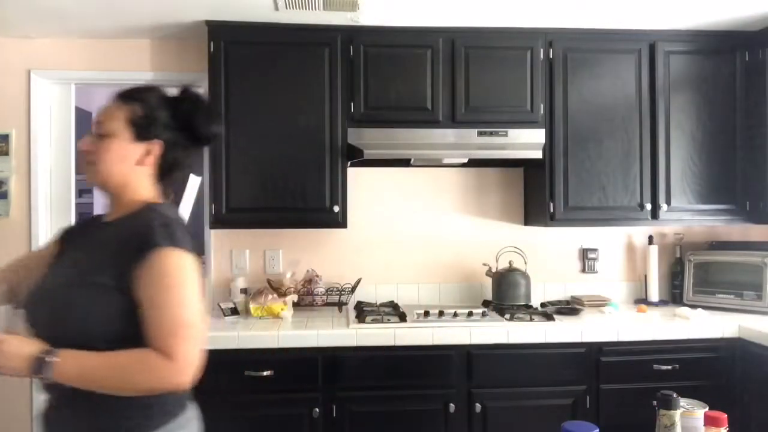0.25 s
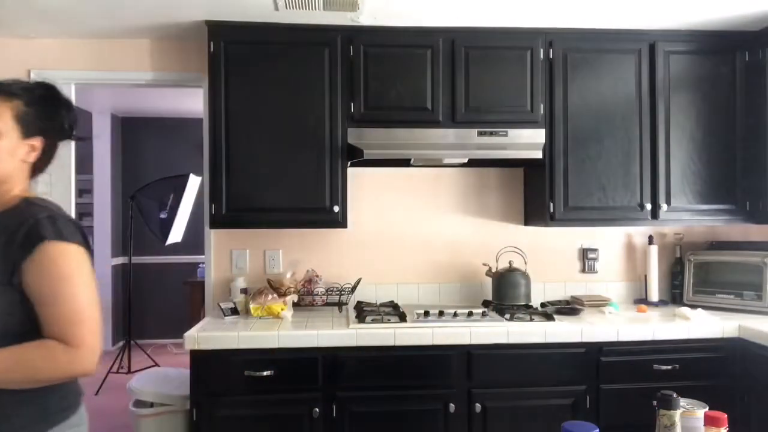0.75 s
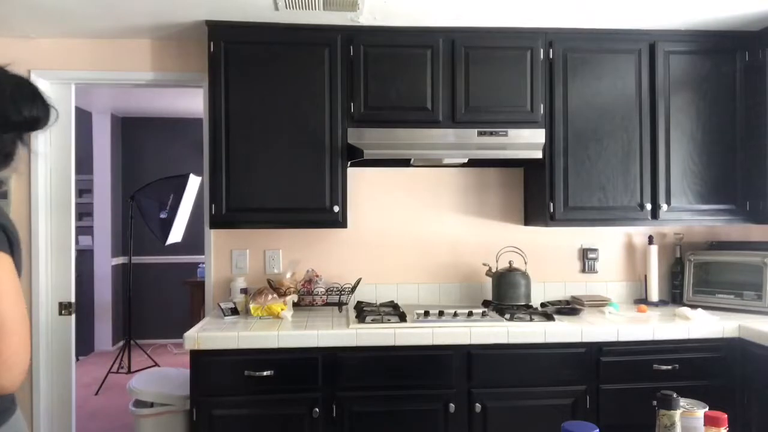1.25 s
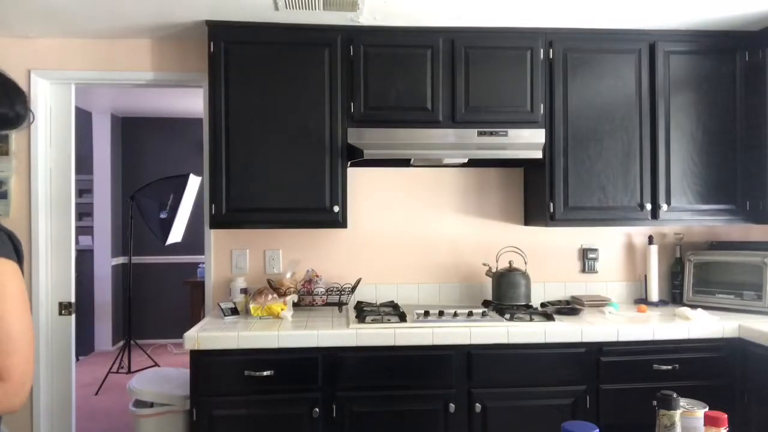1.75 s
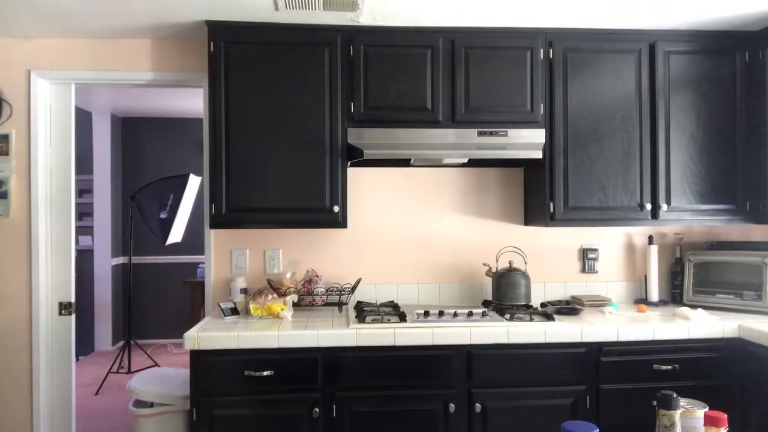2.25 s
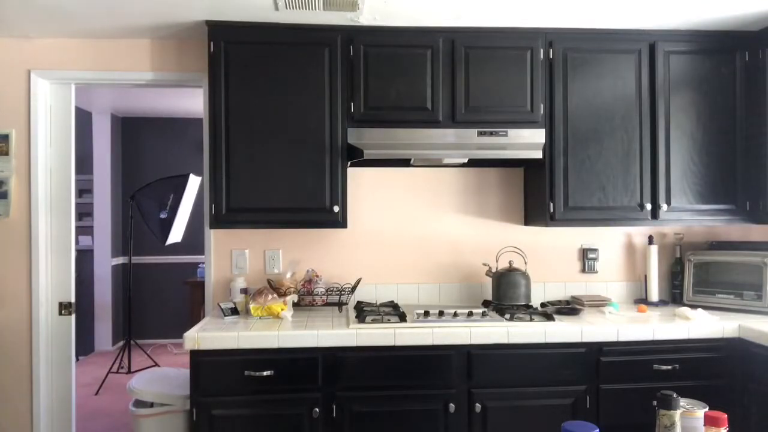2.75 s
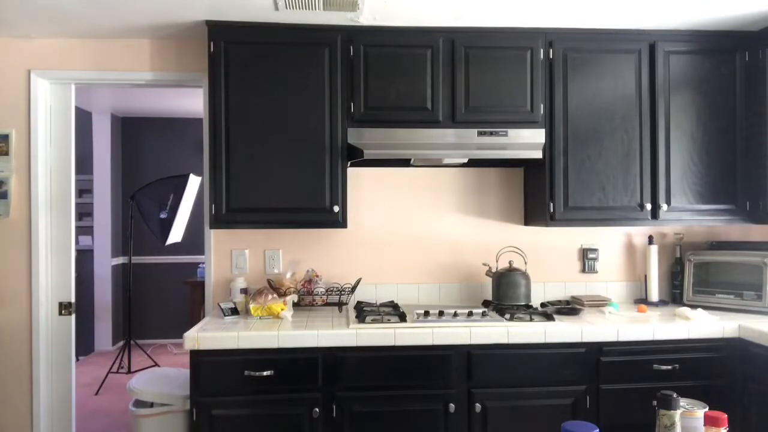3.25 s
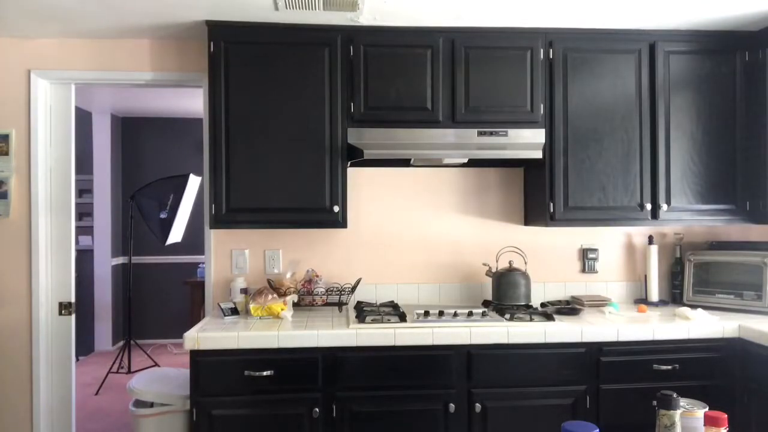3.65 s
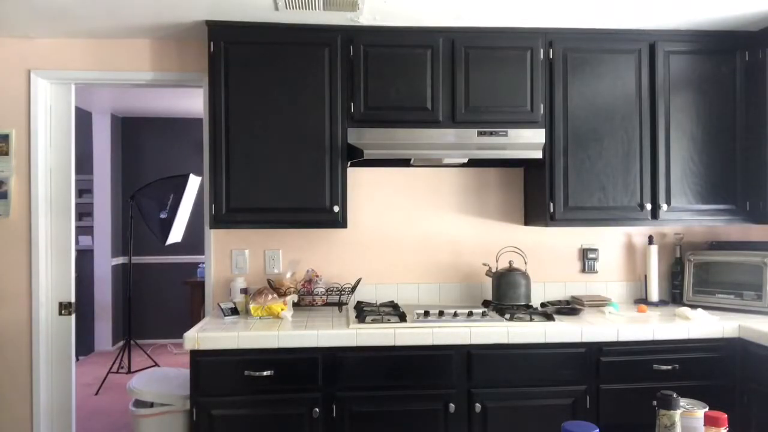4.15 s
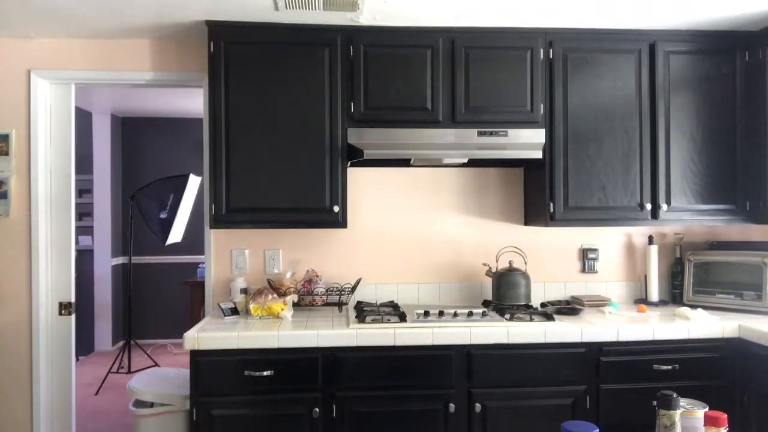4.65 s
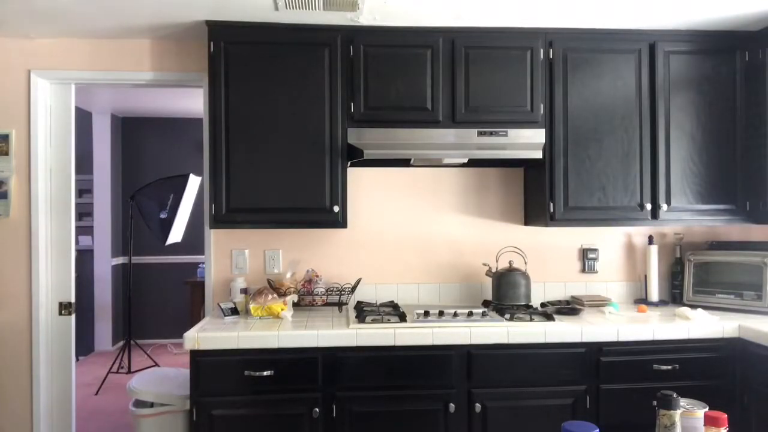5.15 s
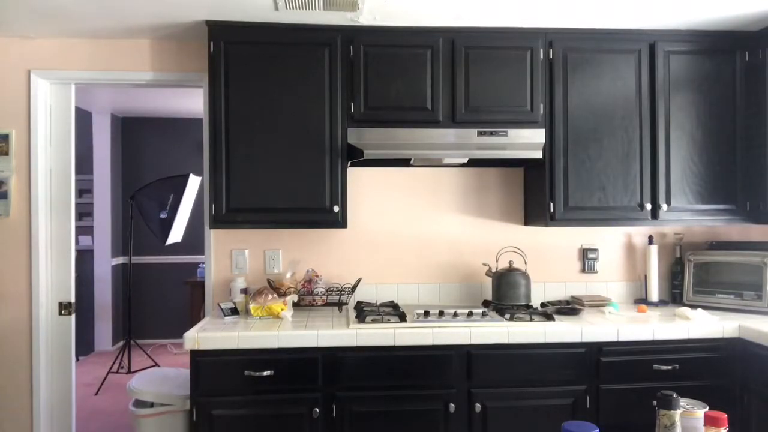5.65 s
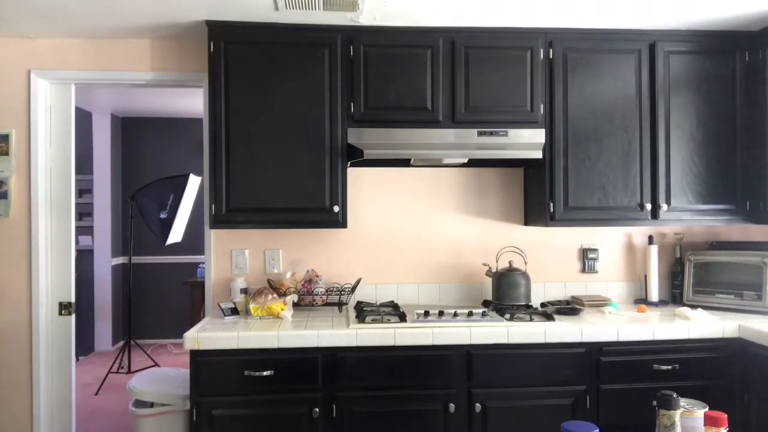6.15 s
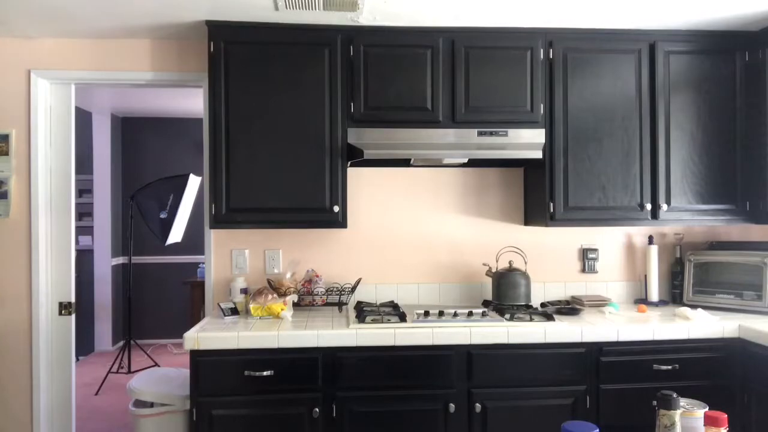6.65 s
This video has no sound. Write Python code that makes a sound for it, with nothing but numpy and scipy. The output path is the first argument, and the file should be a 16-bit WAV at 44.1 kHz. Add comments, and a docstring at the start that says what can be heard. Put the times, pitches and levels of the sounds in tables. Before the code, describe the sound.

In an echoey kitchen, a hand digs noisily through a plastic bin of ice, then a few cubes clink into a drinking glass.

```python
"""In a tiled kitchen, a few steps from the microphone, something hard is put down and a freezer is opened.
A hand digs through the plastic ice bin: random impacts, coloured by the bin, grind, clack and tumble.
Then cubes drop into the glass and excite its modes, decaying sines in beating pairs.
Rubs, knocks, squeaks and a step are shaped noise and impulses; noise and sines make the room tone.
All is heard in mono, with much room and a low appliance hum."""
import sys
import numpy as np
from scipy import signal
from scipy.fft import rfft, irfft, next_fast_len
from scipy.io import wavfile
from scipy.ndimage import uniform_filter1d

SR = 44100
rng = np.random.default_rng(int(sys.argv[2]) if len(sys.argv) > 2 else 0)


def log_audio(samples):
    """Write samples as a 16-bit WAV file to the path given in sys.argv[1]."""
    # one column per channel
    frames = np.atleast_2d(samples).T
    # limit to full scale, then quantise
    limited = np.clip(frames, -1, 1)
    pcm = np.round(limited * 32767).astype(np.int16)
    wavfile.write(sys.argv[1], SR, pcm)


N = 304290

# Strokes of the hand through the ice. Each row: time of full force in s, rise in s, hold in s,
# clatter in dB, bin rumble in dB against it, crunch in dB against it.
STROKES = [(2.876, 0.047, 0.0063, -23, -8.5, -7), (3.12, 0.34, 0.081, -37, -6.5, -11),
           (3.208, 0.034, 0, -24.5, -5, -3.5), (3.238, 0.12, 0, -26, -3.5, -26),
           (3.381, 0.33, 0.034, -29, -6.5, -6), (3.56, 0.22, 0.017, -28.5, -4, -7.5),
           (3.861, 0.21, 0.049, -32.5, -8, -6), (4.193, 0.18, 0.23, -35.5, -15, -10),
           (4.446, 0.42, 0.27, -29.5, -8.5, -9), (4.87, 0.065, 0, -53, 1.5, -4),
           (5.042, .15, 0.015, -57, -1.5, -8), (5.743, .01, 0, -33.5, -15, -3),
           (5.829, 0.015, 0.0075, -33.5, 1, -12), (5.9, 0.06, 0.11, -40, -1, -11),
           (6.067, 0.026, 0, -40, -3, -6)]
# The hollow of the bin. Each row: time in s, level in dB against the clatter.
HOLLOW_LEVELS = [(2.85, -30), (3.9, -49), (4.2, -31), (4.8, 6.5), (5.1, -19), (6.3, -14)]
# Spectrum of cubes in the bin. Each row: frequency in Hz, relative density in dB per Hz.
ICE_SPECTRUM = [(71, -69), (120, -7.5), (246, -8), (314, -1), (483, -5.5), (949, 4), (2930, 3.5),
                (4780, -2), (5990, -13), (10400, -20), (14400, -20.5), (16000, -25)]
# Peaks and dips of the bin. Each row: centre in Hz, width in Hz, height in dB.
BIN_RESONANCES = [(340, 59, 1.5), (409, 81, 7), (564, 200, 3), (912, 63, 3.5), (1540, 940, 3.5),
                  (2860, 310, 1), (4830, 800, -9.5), (6280, 1400, 4), (10420, 430, -6)]
# Single hard clacks of ice in the bin. Each row: start in s, relative level in dB,
# relative thud in dB, relative crack in dB.
CLACKS = [(2.854, -15.5, -1, -20), (3.207, -16, -10.5, 1), (3.236, -20, -30, -24), (3.274, -12.5, -17, -22),
          (3.574, -18.5, -1, -5), (4.185, -28, -9, -12), (4.449, -12.5, -6, -10.5),
          (4.492, -15.5, -20, -12), (4.576, -19, -1.5, -13), (4.738, -22, -5, -39), (4.779, -29.5, -2, -31),
          (5.626, -34, -31, -10), (5.739, -14.5, -23, -16), (5.747, -19, -8.5, -31),
          (5.826, -13.5, -26, -11), (5.879, -23.5, -10, -7), (5.903, -21, -27, -7),
          (6.025, -22.5, -4.5, -12.5), (6.085, -26.5, -2.5, -13.5)]
# Last cubes tumbling on the hollow bin. Each row: start in s, level in dB.
THUMPS = [(5.828, -40), (5.901, -39), (6.024, -43.5), (6.085, -46)]
# Modes of the bin walls. Each row: frequency in Hz, level in dB, t60 in s.
WALL_MODES = [(318.4, -5, 0.15), (556, -1.5, 0.06), (828, -3, 0.025), (920, -15, 0.033), (1450, -8.5, 0.15)]
# Cubes landing in the glass. Each row: start in s, relative ring in dB,
# frequency in Hz that the point of contact favours, relative tap in dB.
DROPS = [(6.654, -28.5, 1897, -25), (6.706, -29.5, 4222, -18.5), (6.862, -26, 5320, -28)]
# Modes of the tumbler. Each row: frequency in Hz, level in dB at a favoured contact, t60 in s.
GLASS_MODES = [(585, 0, .11), (1490, -10, .03), (1897, 1, .18), (2309, -10, .05), (3112, -7, .05),
               (3505, -11, .05), (4222, 0, .17), (5320, 0, .015), (5780, -8, .04), (7340, -1, .03),
               (7800, -7, .04), (11278, -12, .06), (11878, -12, .06), (15095, -13, .02)]
# Things handled and the freezer door. Each row: start in s, relative level in dB,
# relative thud in dB, relative crack in dB.
KNOCKS = [(0.218, -41, -5, -16), (0.383, -46, -36, -4.5), (0.468, -43.5, -17, -2.5), (0.861, -43, 0.5, -9),
          (0.959, -51, 11, -3), (1.127, -25, -8, -19), (1.742, -44, -33, -7.5), (2.621, -25.5, -4.5, -18),
          (6.384, -50, -21, -10), (6.485, -48, -24, -8.5)]
# Modes of something hard set down on the counter. Each row: frequency in Hz, level in dB, t60 in s.
SET_DOWN_MODES = [(345, -2, .16), (964, -5, .12), (1480, -1.5, .008), (2540, -12, .1), (3175, 0, .26),
                  (3795, -20, .1), (4170, -13, .1), (8861, -24, .15)]
# Jolts to the freezer. Each row: start in s, level in dB.
JOLTS = [(2.621, -54), (2.868, -53), (3.235, -59.5)]
# Modes of the freezer cabinet. Each row: frequency in Hz, level in dB, t60 in s.
CABINET_MODES = [(86.4, 2, 2.1), (138.5, 2.5, 0.93), (211, 2, 0.19), (227.7, 8, 0.23), (653, 7.5, 0.041)]
# Modes of a bright clink as the bin is reached. Each row: frequency in Hz, level in dB, t60 in s.
CLINK_MODES = [(1370, 4, .03), (2600, 3.5, .02), (4120, 5.5, 0.052), (4560, -1, .03), (5500, 7, 0.041),
               (6100, 8, 0.047), (7970, 4, 0.018), (9400, -17.5, .02), (10990, -18.5, .02),
               (12400, -19, .02), (13200, -2, .03)]
# Soft rubbing and sliding of things being handled. Each row: time of full force in s, rise in s,
# hold in s, relative hiss in dB, relative body in dB against it.
RUBS = [(0, 0.011, 0, -53, -8), (0.21, .01, 0.23, -55.5, -11), (.48, 0.19, 0, -47.5, -19),
        (0.633, 0.24, 0.0051, -58, -20), (0.855, 0.17, 0.038, -49.5, 0), (.96, .1, 0.0082, -55, 6.5),
        (1.086, .08, 0, -59, -14), (1.686, 0.18, 0.013, -59.5, -26), (1.75, 0.017, 0.017, -53, -19),
        (1.88, .2, 0, -58, -17), (2.6, 0.087, 0.13, -55.5, -4), (5.487, .06, 0.11, -64, 5),
        (5.605, 0.23, 0.11, -46, -10), (6.384, .3, 0.36, -65, 3.5), (6.794, .02, .08, -39, -14)]
# Faint high squeaks. Each row: start in s, length in s, level in dB.
SQUEAKS = [(.56, .15, -62), (1.06, .19, -64)]
# Reverberation of the kitchen. Each row: frequency in Hz, t60 of the tail in s.
REVERBERATION = [(100, 1), (300, 0.51), (2000, 0.67), (5000, 0.58), (13000, 0.4)]
# Spectrum of the room tone. Each row: frequency in Hz, relative density in dB per Hz.
AIR_SPECTRUM = [(15, -46), (25, -6), (48, -12), (68, 5.5), (97, -4.5), (137, -6), (170, -12.5), (217, -4.5),
                (317, -8.5), (575, -11.5), (695, -14), (1130, -12), (1440, -15.5), (3620, -24),
                (10000, -35.5), (16000, -46)]
# Hum of the appliance. Each row: frequency in Hz, level in dB.
HUM = [(59.2, -66), (220.7, -79)]


def digging(rumble_db=-2, clatter_db=-3.0, crunch_db=0, ring_share=0.4, hollow_hz=930, hollow_width_hz=420):
    """Granular collision: cubes tumble over each other and bump the bin; the room carries each stroke on."""
    hits = contacts(rate=120, spread_db=6, steady=0.024)
    cracks = coloured(hits, ice_colour)
    rings = band(cube_rings(hits, centre_hz=2500, spread=.4, t60=.008), 700, 4200)
    ice = cracks / rms(cracks) + ring_share * rings / rms(rings)
    rumble, clatter, crunch = (part / rms(part) for part in registers(ice))
    resonator = signal.iirpeak(hollow_hz, hollow_hz / hollow_width_hz, SR)
    hollow = signal.lfilter(*resonator, clatter)
    clatter = clatter + gains(HOLLOW_LEVELS)[0] * hollow / rms(hollow)
    levels = amp([[rumble_db], [clatter_db], [crunch_db]]) * stroke_levels()
    return in_room(np.sum(levels * [rumble, clatter, crunch], axis=0), count=60)


def stroke_levels(ease_db_per_s=30, settle_s=0.467, crunch_growth=0.86):
    """Addition of powers: overlapping strokes share one gain each for rumble, clatter and crunch."""
    power = np.zeros((3, N))
    for s, rise, hold, db, rumble_db, crunch_db in STROKES:
        force = swell(s, rise, hold, ease_db_per_s, settle_s)
        on = force > 0
        rumble = amp(rumble_db) * force[on]
        crunch = amp(crunch_db) * force[on] ** crunch_growth
        power[:, on] += (amp(db) * np.array([rumble, force[on], crunch])) ** 2
    return np.sqrt(power)


def cube_rings(hits, centre_hz, spread, t60, size=400):
    """Free vibration: each impact rings a cube briefly at a pitch of its own."""
    at, t = np.flatnonzero(hits), np.arange(size) / SR
    hz = centre_hz * np.exp(spread * rng.standard_normal((len(at), 1)))
    hz = np.minimum(hz, SR / 2)
    rings = hits[at, None] * np.sin(2 * np.pi * hz * t) * amp(-60 * t / t60)
    places = at[:, None] + np.arange(size)
    return np.bincount(places.ravel(), rings.ravel(), N + size)[:N]


def ice_colour(hz):
    """Resonance on a broad spectrum: ice on plastic, with the peaks and dips of the bin."""
    bumps = sum(db / (1 + (2 * (hz - centre) / width) ** 2) for centre, width, db in BIN_RESONANCES)
    return amp(along(ICE_SPECTRUM, hz) + bumps)


def ice_clacks():
    """Impact excitation: crumbling clacks take the colour of the bin."""
    return blows(CLACKS, ice_colour, level_db=-15.5, thud_db=-0.5, crack_db=4.5,
                 chatter=0.1, chatter_t60=0.028, direct=0.33)


def thumps():
    """Modal vibration: tumbling cubes make the plastic walls of the bin boom."""
    out = np.zeros(N)
    for s, db in THUMPS:
        add(out, s, amp(db) * ring(WALL_MODES, room=0.59, attack=0.0014))
    return out


def glass(off_db=-12, octaves=0.071, level_db=-5.5):
    """Modal participation: each cube lands on another spot of the wall and brings out other modes."""
    out = np.zeros(N)
    for s, db, favoured_hz, _ in DROPS:
        modes = []
        for hz, mode_db, t60 in GLASS_MODES:
            miss = 1 - np.exp(-(np.log2(hz / favoured_hz) / octaves) ** 2)  # 0 at the favoured pitch
            modes.append((hz, mode_db + off_db * miss, t60))
        add(out, s, amp(db + level_db) * ring(modes, room=1.0))
    return out


def glass_taps():
    """Impact excitation: each landing cube gives the glass a sharp tap."""
    landings = [(s, tap_db, -28, -10.5) for s, _, _, tap_db in DROPS]  # relative thud and crack in dB
    return blows(landings, tap_colour, level_db=-13.5, thud_db=12.0, crack_db=5,
                 chatter=0.03, chatter_t60=0.024, direct=0.41)


def tap_colour(hz, low_hz=1300):
    """Weak low radiation: a hard contact on thin glass has little body."""
    return plain_colour(hz) * hz ** 2 / np.sqrt(hz ** 4 + low_hz ** 4)


def knocks():
    """Impact excitation: clean knocks of things handled and of the freezer door."""
    return blows(KNOCKS, plain_colour, level_db=-11.0, thud_db=2.5, crack_db=4,
                 chatter=0.016, chatter_t60=0.034, direct=0.24)


def fittings():
    """Modal vibration: the thing set down, the jolted freezer and the first clink ring on."""
    out = np.zeros(N)
    add(out, 1.127, amp(-41.5) * ring(SET_DOWN_MODES, room=.85))
    for s, db in JOLTS:
        add(out, s, amp(db) * ring(CABINET_MODES, room=0.71))
    clink = ring(CLINK_MODES, room=.95, tick=6)
    add(out, 2.787, amp(-55.0) * band(clink, 990, 12500))
    return out


def rubbing(body_db=-2, hiss_db=-3.0):
    """Stick and slip: hands and plastic slide in many fine random slips."""
    slips = coloured(contacts(rate=690, spread_db=6), plain_colour)
    body, hiss = band(slips, 200, 2500), band(slips, 2500, 17000)
    body_gain, hiss_gain = rub_levels()
    body = amp(body_db) * body_gain * body / rms(body)
    hiss = amp(hiss_db) * hiss_gain * hiss / rms(hiss)
    return in_room(body + hiss)


def rub_levels(ease_db_per_s=42, release_s=0.36):
    """Addition of powers: overlapping rubs share one gain each for body and hiss."""
    power = np.zeros((2, N))
    for s, rise, hold, db, body_db in RUBS:
        force = swell(s, rise, hold, ease_db_per_s, release_s)
        power += (amp([[db + body_db], [db]]) * force) ** 2
    return np.sqrt(power)


def squeaks(centre_hz=8800, width_hz=600):
    """Narrow-band friction noise: something slides with a thin, hissy squeak."""
    out = np.zeros(N)
    for s, length, db in SQUEAKS:
        noise = rng.standard_normal(int(length * SR))
        hiss = band(noise, centre_hz - width_hz / 2, centre_hz + width_hz / 2)
        add(out, s, amp(db) * np.hanning(len(hiss)) * hiss / rms(hiss))
    return in_room(out)


def footfall(s=0.78, length=0.38, db=-50, top_hz=260):
    """Low-frequency impact noise: a soft step thumps the floor."""
    thump = band(rng.standard_normal(int(length * SR)), 53, top_hz)
    out = np.zeros(N)
    add(out, s, amp(db) * np.hanning(len(thump)) * thump / rms(thump))
    return out


def room_tone(air_db=-57):
    """Stationary noise and pure tones: steady air noise and the hum of an appliance."""
    t = np.arange(N) / SR
    noise = rng.standard_normal(N + SR)
    air = coloured(noise, lambda hz: amp(along(AIR_SPECTRUM, hz)))[SR:]  # the filter's onset is cut off
    hum = np.zeros(N)
    for hz, db in HUM:
        hum += amp(db) * np.sqrt(2) * np.sin(2 * np.pi * (hz * t + rng.random()))
    return amp(air_db) * air / rms(air) + hum


def contacts(rate, spread_db, steady=0.13):
    """Random point process: impacts of uneven size, rate per second, share a steady supply of energy."""
    occurs = rng.random(N) < rate / SR
    hits = occurs * amp(spread_db * rng.standard_normal(N)) * rng.choice([-1, 1], N)
    power = np.abs(uniform_filter1d(hits ** 2, int(steady * SR)))
    return hits / np.sqrt(power + np.mean(power) / 20)


def swell(s, rise, hold, ease_db_per_s, release):
    """Force envelope: a movement builds up to time s, eases while it is held, then dies away."""
    eased_db = -ease_db_per_s * hold
    end = s + hold
    return gains([(s - rise, -30), (s, 0), (end, eased_db), (end + release, eased_db - 60)])[0]


def blows(table, colour, level_db, thud_db, crack_db, chatter, chatter_t60, direct):
    """Impulse excitation: a blow and its short chatter give thud, clack and crack, all filling the room."""
    out, t = np.zeros(N), np.arange(SR // 20) / SR
    for s, db, thud, crack in table:
        blow = chatter * rng.standard_normal(len(t)) * amp(-60 * t / chatter_t60)
        blow[0] += 1
        parts = registers(coloured(signal.fftconvolve(blow, kitchen(direct)), colour))
        levels = amp(db + level_db + np.array([thud + thud_db, 0, crack + crack_db]))
        add(out, s, sum(g * part / rms(part[:SR // 50]) for g, part in zip(levels, parts)))
    return out


def plain_colour(hz, corner_hz=3500):
    """Finite contact time: a hard contact is level up to the corner, then falls."""
    return 1 / (1 + (hz / corner_hz) ** 2) ** 0.82


def ring(modes, room=.7, tick=0., attack=0.0012, split_hz=19, twin=0.75):
    """Split modes: each is a close pair that beats; echoes make them swell in their own ways."""
    t, echo = np.arange(SR) / SR, kitchen()
    out = tick * np.pad(echo, (0, SR - len(echo))) / rms(echo[:SR // 20])
    for hz, db, t60 in modes:
        partner_hz = hz + split_hz * rng.uniform(0.68, 1.32)
        partner = np.sin(2 * np.pi * (partner_hz * t + rng.random()))
        pair = np.sin(2 * np.pi * hz * t) + twin * partner
        tone = pair * amp(-60 * t / t60) * (1 - np.exp(-t / attack))
        wet = signal.fftconvolve(tone, echo)[:SR]
        heard = (1 - room) * tone / rms(tone) + room * wet / rms(wet)
        out += amp(db) * heard / rms(heard[:SR // 10])
    return out * np.minimum(1, 10 * (1 - t))  # fades over the last 0.1 s


def kitchen(direct=0.066, early_db=4, early_t60=0.17):
    """Reverberation: weak direct sound, dense echoes off the cabinets, then the tail, drawn afresh."""
    hz, t, z = signal.stft(rng.standard_normal(SR // 2), SR, nperseg=256)
    late = amp(-60 * t / along(REVERBERATION, hz)[:, None])
    early = amp(early_db - 60 * t / early_t60)
    tail = signal.istft(z * (late + early), SR, nperseg=256)[1][:SR // 2]
    tail /= np.linalg.norm(tail)
    tail[0] += direct
    return tail / np.linalg.norm(tail)


def in_room(x, count=16):
    """Position-dependent response: each stretch of a moving source meets different echoes."""
    out, step = np.zeros(N), N // count + 1
    for i in range(0, N, step):
        stretch = x[i:i + step]
        if stretch.any():
            add(out, i / SR, signal.fftconvolve(stretch, kitchen()))
    return out


def coloured(x, gain):
    """Minimum phase: x through the causal filter with this gain over frequency."""
    m = next_fast_len(len(x) // 2 + SR // 16) * 2
    log_gain = np.log(np.maximum(gain(np.fft.rfftfreq(m, 1 / SR)), 1e-6))
    cepstrum = irfft(log_gain)
    cepstrum[1:m // 2] *= 2  # folding the cepstrum makes the filter causal
    cepstrum[m // 2 + 1:] = 0
    return irfft(rfft(x, m) * np.exp(rfft(cepstrum)))[:len(x)]


def band(x, lo_hz, hi_hz):
    """Band limitation: a Butterworth band-pass."""
    edges = [lo_hz, min(hi_hz, SR / 2 - 100)]
    return signal.sosfilt(signal.butter(4, edges, "band", fs=SR, output="sos"), x)


def registers(x):
    """Spectral division: the low, middle and high part of a sound."""
    return band(x, 170, 700), band(x, 700, 5000), band(x, 5000, 17000)


def amp(db):
    """Level definition: decibels to amplitude gain."""
    return 10 ** (np.asarray(db) / 20)


def rms(x):
    """Effective value: the root mean square."""
    return np.sqrt(np.mean(x ** 2) + 1e-20)


def along(points, hz):
    """Logarithmic frequency scale: (Hz, value) points are interpolated along it."""
    f, v = np.transpose(points)
    return np.interp(np.log(hz + 1), np.log(f + 1), v)


def gains(rows):
    """Level interpolation: one gain per sample for each dB column, silent outside the rows."""
    s, *columns = np.transpose(rows)
    t = np.arange(N) / SR
    return [amp(np.interp(t, s, column, left=-np.inf, right=-np.inf)) for column in columns]


def add(track, s, sound):
    """Superposition: mix a sound into the track at time s."""
    part = track[max(round(s * SR), 0):][:len(sound)]
    part += sound[:len(part)]


def scene():
    """Superposition: everything reaches one microphone, given on two equal channels."""
    bin_sounds = digging() + ice_clacks() + thumps()
    glass_sounds = glass() + glass_taps()
    handling = knocks() + fittings() + rubbing() + squeaks()
    mono = bin_sounds + glass_sounds + handling + footfall() + room_tone()
    return np.array([mono, mono])


def record(dry, low_hz=35, top_hz=15850):
    """Limited bandwidth: the microphone loses the deepest bass; nothing is kept above the band limit."""
    m = next_fast_len(N + SR // 2)
    hz = np.fft.rfftfreq(m, 1 / SR)
    response = (hz < top_hz) * hz ** 2 / np.sqrt(hz ** 4 + low_hz ** 4)
    return irfft(rfft(dry, m) * response, m)[:, :N]


dry = scene()
out = record(dry)
log_audio(out)
```